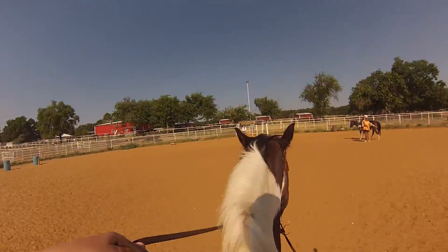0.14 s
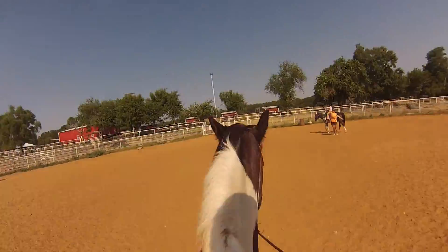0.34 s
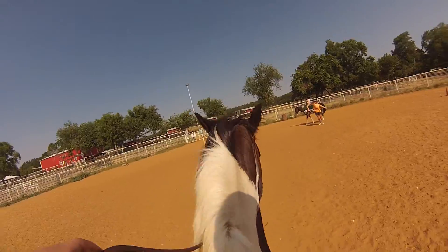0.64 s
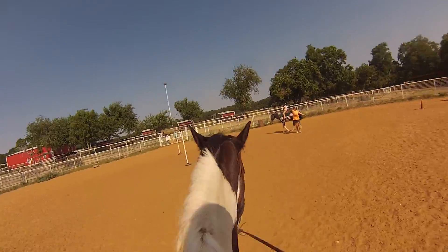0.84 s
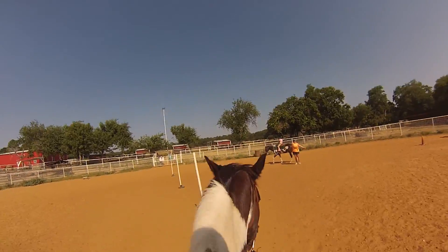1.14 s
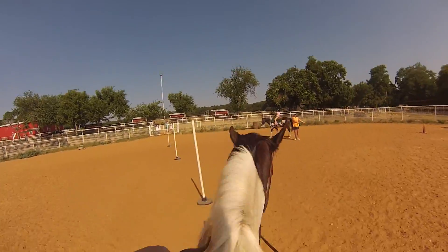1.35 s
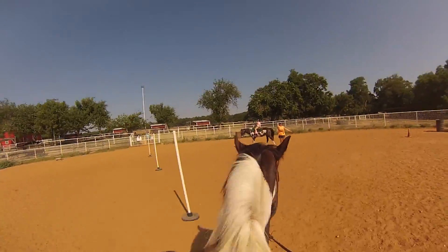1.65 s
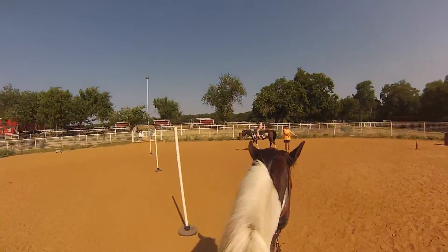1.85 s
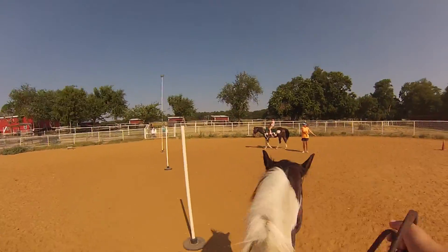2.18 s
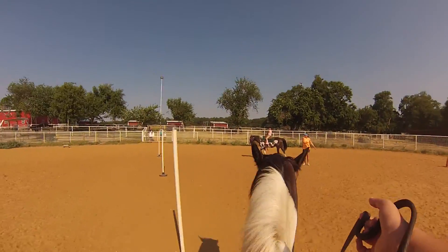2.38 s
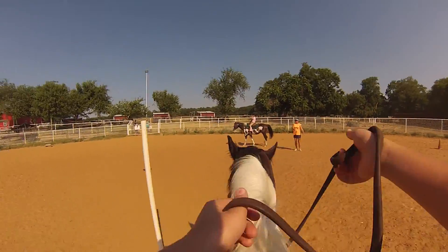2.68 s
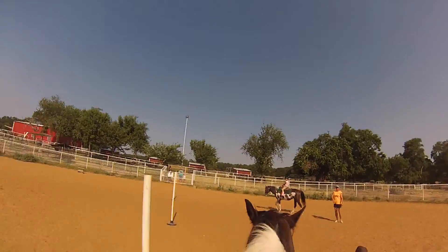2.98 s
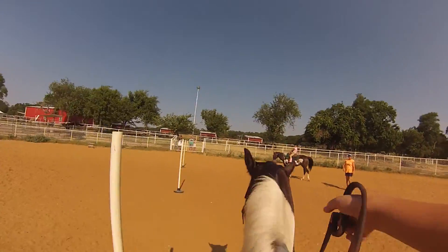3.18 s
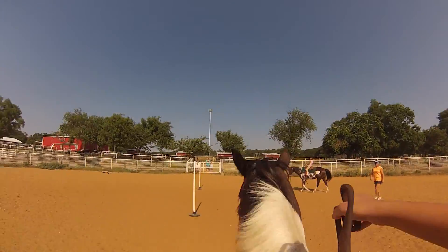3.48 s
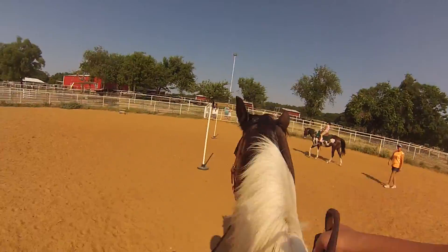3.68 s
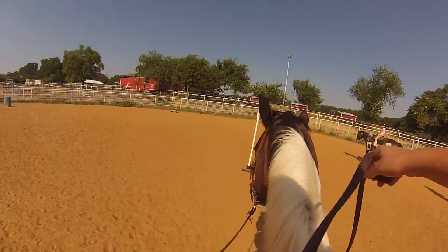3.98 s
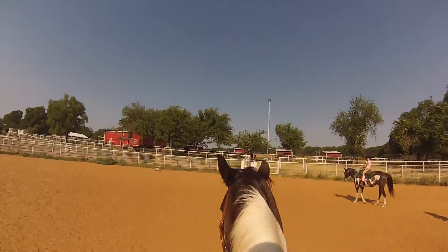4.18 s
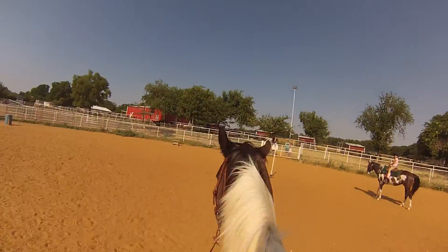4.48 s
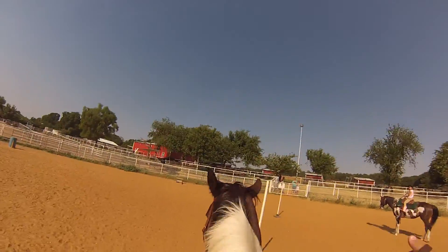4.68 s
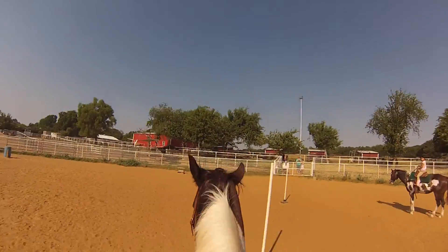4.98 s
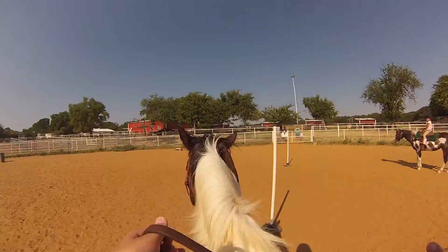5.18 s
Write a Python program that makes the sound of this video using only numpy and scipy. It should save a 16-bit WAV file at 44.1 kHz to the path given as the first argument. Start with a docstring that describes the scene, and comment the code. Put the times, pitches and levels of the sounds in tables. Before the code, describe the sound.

Close, dry, nearly mono handling sound. A loose clip ticks roughly every quarter second over low rumble and faint hiss. Buckles tap, plastic clacks with a short metallic ring, and harness bumps dully. The first half is lighter; the second brings bursts of rubbing and shaking, then heavy distorted thuds repeating until the end. The outdoor arena itself adds no audible echo.

```python
"""Camera housing on horseback

A camera in a plastic housing rides on a trotting, then cantering rider in a sandy arena.
Struck resonances make the ticking clip, the knocking housing and the tapping straps and harness.
Shaped noise makes body rumble, shaking, rubbing, hiss and a faint squeak; landings are pulses of
pressure that thump on the sealed-in microphone and crackle as the microphone capsule distorts."""
import sys
import numpy as np
from scipy import signal
from scipy.io import wavfile
from scipy.ndimage import uniform_filter1d

SR = 44100
rng = np.random.default_rng(int(sys.argv[2]) if len(sys.argv) > 2 else 0)


def boost(x):
    """Linear amplitude factor 10**(x/20) for a level x in decibels (scalar or array-like)."""
    u = np.asarray(x, float) / 20
    return 10 ** u


def master(y):
    """Save y as 16-bit WAV."""
    cut = np.clip(np.atleast_2d(y).T, -1, 1)
    pcm = np.round(cut * 32767)  # scale
    wavfile.write(sys.argv[1], SR, pcm.astype(np.int16))


N = 235208   # samples, 5.33 s


def rms_one(x):
    """Normalisation of signal power: scaled to unit rms."""
    return x / np.sqrt(np.mean(x ** 2) + 1e-20)


def low_pass(x, hz, order=2):
    """Butterworth low-pass filtering: the spectrum falls off above hz."""
    return signal.sosfilt(signal.butter(order, hz, fs=SR, output="sos"), x)


def drift(rate_hz):
    """Random modulation: low-passed noise of spread 1, computed at every 40th sample."""
    r = np.exp(-80 * np.pi * rate_hz / SR)
    white = rng.standard_normal(N // 40 + 2002)
    slow = signal.lfilter([1], [1, -2 * r, r * r], white)[2000:]   # settled part only
    return np.interp(np.arange(N) / 40, np.arange(len(slow)), rms_one(slow))


def coloured(spectrum, patchy_db):
    """Spectral shaping: noise in third-octave bands, each flickering on its own; unit rms."""
    hz, level_db = np.transpose(spectrum)
    white, out = rng.standard_normal((2, N)), np.zeros(N)
    octaves = np.log2(min(hz[-1], .45 * SR) / hz[0])
    edges = hz[0] * 2 ** np.arange(0, octaves, 1 / 3)
    for k, (low, high) in enumerate(zip(edges, edges[1:])):
        band_filter = signal.butter(2, [low, high], "band", fs=SR, output="sos")
        band = signal.sosfilt(band_filter, white[k % 2])   # neighbours take different noise
        band_db = np.interp(np.log(low * high) / 2, np.log(hz), level_db)
        out += band * boost(band_db + patchy_db * drift(17))
    return rms_one(out)


def evened(x, window_s):
    """Envelope levelling: chance swells taken out, so that the motion alone sets the level."""
    power = uniform_filter1d(x ** 2, int(window_s * SR))
    return rms_one(x / np.sqrt(power + .1 * np.mean(x ** 2)))


def swells(times, level_db, rise_s, fall_s):
    """Exponential envelopes, summed: each climbs 20 dB within the rise, sinks 20 dB within the fall."""
    out, t = np.zeros(N), np.arange(N) / SR
    for s, db, rise, fall in np.broadcast(times, level_db, rise_s, fall_s):
        distance = np.where(t < s, (s - t) / max(rise, .005), (t - s) / max(fall, .005))
        out += boost(db - 20 * distance)
    return out


def ring(clicks, hz, t60):
    """Damped oscillator: a unit click sets a decaying sine of height 1 ringing."""
    r, w = boost(-60 / (max(t60, .002) * SR)), 2 * np.pi * hz / SR
    return signal.lfilter([0, np.sin(w)], [1, -2 * r * np.cos(w), r * r], clicks + 1e-18)


def chatter(times, length_ms, count=5):
    """Repeated impact: a first contact and weaker rebounds, as sample positions and signed sizes."""
    draw = rng.random((len(times), 2, count))
    lag = draw[:, 0] * (np.arange(count) > 0)   # share of the chatter length; 0 is the first contact
    at = (times[:, None] + lag * length_ms / 1000) * SR
    sign = np.where(lag > 0, np.sign(draw[:, 1] - .5), 1)
    size = boost(-8 * lag - 5 * (lag > 0)) * sign
    return np.minimum(at.astype(int), N - 1), size


def first(blows):
    """Single impact: only the first contact of each blow."""
    return blows[0][:, :1], blows[1][:, :1]


def struck(modes, blows, level_db, soft=False):
    """Modal excitation: all modes feel the same contacts, each with strengths of its own."""
    out, (at, size) = np.zeros(N), blows
    for k, (hz, db, t60) in enumerate(modes):
        clicks = np.zeros(N)
        weaker_db = 4 * rng.random(size.shape)
        np.add.at(clicks, at, size * boost(db + level_db[:, None] - weaker_db))
        mode = ring(clicks, hz, t60)
        if soft:   # the resonance applied twice swells in; brought back to height 1
            mode = ring(mode, hz, t60) * 2 * np.e * np.log(1000) / (t60 * SR)
        out += mode * (-1) ** k
    return out


def crack(times, level_db, length_ms, spectrum):
    """Broadband contact noise: a burst that decays faster the shorter the chatter."""
    shape, t = np.zeros(N + SR), np.arange(SR // 20) / SR
    burst = np.exp(-1400 * t / length_ms) * (1 - np.exp(-t / 0.0001))
    for s, db in zip(times, level_db):
        shape[round(s * SR):][:len(t)] += boost(db) * burst
    return shape[:N] * coloured(spectrum, patchy_db=1.5)


def dull(events, rise_hz):
    """Single-mode impact: soft contacts with one pitch each, low-passed at rise_hz."""
    out = np.zeros(N)
    for s, db, hz, t60 in np.array(events)[:, :4]:
        contact = chatter(np.array([s]), 3.0, count=1)
        out += struck([(hz, db, t60)], contact, np.zeros(1))
    return low_pass(out, rise_hz)


# liveliness of the gait: time_s, level_db
GAIT = [(0.0, -46.5), (0.8, -45), (1.5, -48.5), (1.77, -46.5), (2.52, -42), (3.38, -41), (3.58, -40),
        (4.9, -41.5), (5.02, -45.5), (5.33, -46)]


def gait():
    """Common modulation: one level in dB over time, which the steady layers follow."""
    s, level_db = np.transpose(GAIT)
    return np.interp(np.arange(N) / SR, s, level_db)


# pass band of the body rumble: low_hz, high_hz
RUMBLE_BAND = (3.73, 25.5)
# the rider's weight coming down swells the rumble: peak_s, level_db
HEAVES = [(0.18, -25), (0.68, -36), (1.21, -28), (1.45, -24), (1.661, -28.5), (2.08, -27.5), (2.441, -30),
          (2.781, -33.5), (3.59, -9), (3.738, -22), (4.03, -14.5), (4.412, -11), (4.578, -24.5),
          (4.841, -15.5), (4.959, -25.5), (5.25, -12)]


def rumble(gait_db):
    """Low-frequency random vibration: band-passed noise under the gait and the falling weight."""
    band = signal.butter(1, RUMBLE_BAND, "band", fs=SR, output="sos")
    low = low_pass(signal.sosfilt(band, rng.standard_normal(N + SR)), 34)[SR:]
    level = boost(gait_db + 7) + swells(*np.transpose(HEAVES), rise_s=0.055, fall_s=0.055)
    return level * evened(low, window_s=0.93)


# the harness strains against the body: peak_s, rubbing_db, shaking_db, rise_s, fall_s
STRAINS = [(0.04, -86, -49.5, 0.019, 0.045), (0.389, -60, -60, 0.15, 0.011),
           (0.96, -47.5, -47.5, 0.084, 0.056), (1.2, -59, -46, 0.11, 0.067), (1.44, -57, -47, 0.18, 0.22),
           (1.65, -57, -39.5, .03, 0.05), (2.11, -55.5, -49.5, 0.065, 0.35),
           (2.449, -52.5, -52.5, 0.12, 0.17), (2.701, -61, -36, 0.033, 0.083),
           (3.011, -36.5, -31, 0.029, 0.13), (3.37, -46, -48, .12, 0.14), (3.569, -36, -25.5, 0.029, 0.02),
           (3.8, -43, -32.5, 0.11, 0.083), (3.989, -42.5, -29.5, 0.044, 0.076),
           (4.22, -56.5, -47, 0.034, 0.083), (4.389, -43.5, -24.5, 0.033, 0.041),
           (4.601, -52, -52, 0.1, 0.2), (4.81, -43.5, -29, .04, 0.071), (5.031, -56.5, -47, 0.064, 0.22),
           (5.23, -45, -25.5, 0.047, 0.032)]


def strains():
    """Load-driven excitation: the envelopes of rubbing and of shaking under each strain."""
    s, rub_db, shake_db, rise, fall = np.transpose(STRAINS)
    return swells(s, rub_db, rise, fall), swells(s, shake_db, rise, fall)


# spectrum of the shaken housing: frequency_hz, density_db (per Hz)
SHAKE = [(50, -14), (80, 8), (130, 3), (200, 0), (300, -26.5), (500, -9)]


def shaking(gait_db, strain):
    """Forced random vibration: flickering low noise of the housing follows gait and strain."""
    noise = evened(coloured(SHAKE, patchy_db=2.5), window_s=0.012)
    return boost(2.0 * drift(16)) * noise * (boost(gait_db - 9) + strain)


# spectrum of cloth and leather friction: frequency_hz, density_db (per Hz)
RUB = [(150, -31), (260, -3), (484, -2), (873, -7), (1360, -4), (1740, -29.5), (1980, -13), (2370, -6),
       (2930, -9.5), (3940, -20), (4410, -13), (7210, -30.5), (13000, -25.5)]
# resonances of the housing under rubbing: frequency_hz, width_hz, level_db
RUB_RINGS = [(1100, 200, -8), (2480, 250, -4), (3950, 200, -12), (4800, 200, -19), (6000, 300, -20),
             (10600, 500, -27)]


def rubbing(gait_db, strain):
    """Stick-slip friction: a hiss with tiny slips in it, carried through the housing's resonances."""
    slips_per_s, slip_spread_db, slip_decay_s = 700, 3.5, 0.00084
    sizes = boost(slip_spread_db * np.minimum(rng.exponential(1, N), 4))
    slips = (rng.random(N) < slips_per_s / SR) * sizes
    slipping = rms_one(signal.lfilter([1], [1, -np.exp(-1 / (slip_decay_s * SR))], slips))
    friction = coloured(RUB, patchy_db=1.0) * (1 + boost(-6) * slipping)
    rings = sum(boost(db) * rms_one(ring(friction, hz, 2.0 / width)) for hz, width, db in RUB_RINGS)
    rub = rms_one(rms_one(friction) + rings) * boost(3 * drift(40))
    steady_db = -72 + 0.95 * (gait_db - gait_db.mean())
    return rub * (boost(steady_db) + strain)


# spectrum of the self-noise: frequency_hz, density_db (per Hz)
SELF_NOISE = [(150, -18.5), (260, -0.5), (1620, -13), (2440, -9.5), (2950, -17), (3960, -17), (12400, -27),
              (14900, -26.5), (16000, -53)]


def self_noise():
    """Stationary background noise: a steady coloured hiss."""
    return boost(-61) * coloured(SELF_NOISE, patchy_db=1.46)


# straps and buckles tapping: start_s, level_db, pitch_hz, t60_s, edge_db (relative to level)
TAPS = [(0.048, -31, 1094, 0.062, -1.5), (0.834, -39, 1075, 0.061, -3), (1.224, -52.5, 500, .01, 10),
        (1.24, -32.5, 1070, 0.061, 1), (1.415, -27, 530, 0.03, -6), (1.635, -33, 780, 0.028, -9),
        (1.722, -44, 447, 0.017, 3), (3.362, -34, 423, 0.022, 0), (3.544, -32.5, 405, 0.026, -27),
        (3.649, -36, 505, 0.021, -8), (3.753, -29, 1096, 0.064, -13), (3.946, -36, 474, 0.031, -3.5),
        (3.973, -46, 473, 0.02, 11.5), (4.153, -34.5, 463, 0.013, -29), (4.244, -56, 504, .01, 14),
        (4.261, -51, 500, 0.0092, 15), (4.275, -61, 500, .01, 10), (4.333, -60, 500, .01, 12),
        (4.359, -40.5, 472, 0.091, 4), (4.397, -50, 500, .01, 17), (4.44, -55, 497, 0.011, 20),
        (4.457, -36, 1700, 0.03, 5), (4.894, -30.5, 857, 0.029, -4.5), (5.033, -25, 473, 0.0068, -27),
        (5.198, -37.5, 411, 0.085, 6), (5.244, -38.5, 420, 0.011, 18.5), (5.321, -30, 850, 0.021, -3)]
# short resonances of the housing's body, lid and upper range: frequency_hz, level_db, t60_s
BODY = [(497.6, 3.7, 0.019), (778, 3.8, 0.021), (1137, 4.2, 0.014), (1295, 5, 0.018), (1745, 7.9, 0.0086)]
BODY_LID = [(1966, -2, 0.018), (2207, 1.5, 0.013), (2429, -4.5, 0.011), (2720, -0.5, 0.0026)]
BODY_HIGH = [(3910, -5, 0.009), (3380, -7, 0.0067), (4694, -22.5, 0.033), (6470, -21, 0.013),
             (10730, -8, 0.0033)]


def taps():
    """Impact on a coupled body: each tap has its own pitch and an edge from the whole housing."""
    s, db, _, _, edge_db = np.transpose(TAPS)
    edge = struck(BODY + BODY_LID + BODY_HIGH, chatter(s, 6.0), db + edge_db - 11)
    return dull(TAPS, rise_hz=2500) + edge


# loose clip ticking on the housing: start_s, level_db, upper_db, low_db (rings, relative to level)
TICKS = [(0.06, -29, 4, -11.5), (0.2444, -26.5, 2, -19.5), (0.4957, -31.5, 10.5, -17.5),
         (0.7254, -32, 5.5, -19.5), (1.0858, -24, 1, -21), (1.3475, -30, 2, -14.5), (1.5874, -22.5, 1, -22),
         (1.8279, -25, -2.5, -18), (2.098, -35, 6.5, -19), (2.3039, -23.5, 0, -22),
         (2.5263, -23.5, -4, -12), (2.7423, -25, -0.5, -10.5), (2.961, -29.5, 5.5, -17.5),
         (3.1797, -25.5, 0.5, -20), (3.422, -19, 1.5, -20), (3.6738, -37, -4, -21),
         (3.8815, -19.5, -6.5, -22), (4.0704, -27.5, 1, -21), (4.3026, -22.5, 2.5, -17),
         (4.5287, -27.5, 1.5, -6.5), (4.777, -24, 1, -23.5), (4.9881, -31.5, 6.5, -11.5),
         (5.2066, -27, -0.5, -8.5)]
CLIP = [(5084, 1.5, 0.011), (5466, 9, 0.0052), (3360, -13.5, 0.0085), (4046, -10.5, 0.0065),
        (6270, -25.5, 0.0055), (9920, -19.5, 0.0084)]
CLIP_UPPER = [(7170, 3.4, 0.0048), (7535, 3.6, 0.01), (7792, 6.5, 0.0057)]
CLIP_HIGH = [(12170, 11.5, 0.0029), (13000, -3.5, 0.007), (13360, -7, 0.0081), (10550, -0.5, 0.0017)]
CLIP_LOW = [(2190, -1, 0.012), (2330, -3, 0.012), (2584, -9, 0.008), (1300, -12, 0.012)]
SNAP = [(900, -2.5), (2300, 2.5), (3200, -21), (6000, 8), (8200, -2.5), (9000, -20), (12500, -6),
        (16000, -30)]
# long-ringing metal of the mount: frequency_hz, knock_db, tick_db, t60_s
METAL = [(2030, -7, -19, .12), (2255, -16, -30, .13), (3700, -43, -50, .12), (4877, -44, -27, .14),
         (5295, -40, -13, .088), (5448, -56, -25, .22), (5715, -62, -35, .15), (6550, -38, -27, .09),
         (6760, -62, -33, .15), (7461, -58, -34, .16)]


def ticks():
    """Light impact with rebounds: bright, thin contacts; the duller ones wake the metal most."""
    chatter_ms = 3.65
    s, db, upper_db, low_db = np.transpose(TICKS)
    high_db = -26.5 + 1.2 * upper_db   # the highest ring follows the upper one
    blows = chatter(s, chatter_ms, count=7)
    out = struck(CLIP, blows, db - 12.5, soft=True)
    out += struck(CLIP_UPPER, blows, db + upper_db - 13.5, soft=True)
    out += struck(CLIP_HIGH, blows, db + high_db, soft=True)
    out += struck(CLIP_LOW, blows, db + low_db + 5.5, soft=True)
    out += crack(s, db - 10.5, chatter_ms, SNAP)
    metal = [(hz, tick_db, t60) for hz, _, tick_db, t60 in METAL]
    uneven_db = 3 * rng.standard_normal(len(s))
    return out + struck(metal, first(blows), db - 9.5 - .3 * upper_db + uneven_db)


# housing knocking in its mount: start_s, level_db, treble_db, bass_db, lid_db (relative to level)
KNOCKS = [(0.108, -15.5, -6, -10, -4.5), (1.128, -24.5, -32, -8, -14), (1.5865, -4.5, -15.5, -10, -6.5),
          (2.0866, -10.5, -7, -12.5, -8.5), (2.305, -28.5, -12, -0.5, -9), (2.466, -46.5, 12, -17, 2.5),
          (2.7236, -6, -27, -10.5, -8.5), (2.9908, -18, -10, -18, -6), (3.007, -4, -15.5, -10.5, -7.5),
          (3.441, -23, -38, -14, -10.5), (3.799, -10, -6, -8.5, -4), (4.6353, -11.5, -3.5, -17.5, -2.5),
          (5.052, -27.5, -12, -2, -7)]
# low resonances of the housing: frequency_hz, level_db, t60_s
BODY_LOW = [(165, 5, 0.039), (112, -19, 0.058)]
# spectrum of the housing's contact: frequency_hz, density_db (per Hz)
CLACK = [(330, -5), (500, 7), (1000, -17.5), (2500, 1.5), (3000, -5), (5000, -29.5), (8000, -35.5),
         (9000, -45.5), (15000, -32)]


def knocks():
    """Heavy impact: blows crack and set the modes of the plastic body and the metal ringing."""
    chatter_ms = 4.5
    s, db, high_db, low_db, lid_db = np.transpose(KNOCKS)
    blows = chatter(s, chatter_ms)
    out = struck(BODY, blows, db - 7.0)
    out += struck(BODY_LID, blows, db + lid_db + 0.5, soft=True)   # the lid takes up the blow later
    out += struck(BODY_HIGH, blows, db + high_db + 9)
    out += struck(BODY_LOW, first(blows), db + low_db + 2)
    out += crack(s, db - 5, chatter_ms, CLACK)
    metal = [(hz, knock_db, t60) for hz, knock_db, _, t60 in METAL]
    glancing_db = .6 * np.maximum(high_db, -17)   # glancing, bright blows wake the metal less
    out += struck(metal, first(blows), db + lid_db - 8 - glancing_db)
    return low_pass(out, 9000)


# dull bumps of the harness: start_s, level_db, pitch_hz, t60_s
BUMPS = [(0.239, -29.5, 130, 0.023), (0.421, -26.5, 161, 0.027), (0.902, -26, 194, 0.048),
         (1.413, -24, 178, 0.071), (1.721, -27.5, 140, 0.036), (2.207, -21, 160, 0.046),
         (2.738, -9, 186, 0.014), (3.361, -33, 140, 0.04), (3.557, -12.5, 156.5, 0.12),
         (3.999, -41, 165, 0.12), (4.144, -32.5, 194, 0.045), (4.385, -17.5, 120, 0.14),
         (4.648, -9.5, 164.5, 0.065), (4.775, -17, 151, 0.0066), (5.031, -27, 132, 0.096)]


def bumps():
    """Soft impact: a compliant contact excites one low mode and little treble."""
    return dull(BUMPS, rise_hz=500)


# landings shoving the microphone: peak_s, level_db, width_ms, direction (+1 or -1)
JOLTS = [(1.212, -19, 23, 1), (3.566, -3.5, 9.3, 1), (3.574, 1, 2.32, -1), (4.008, -9.5, 2.75, -1),
         (4.033, -17, 13, 1), (4.363, -12.5, 3.1, 1), (4.39, 2.5, 2.28, 1), (4.414, -8.5, 3.9, -1),
         (4.818, -4, 5.8, 1), (4.827, -9, 1.46, -1), (5.221, 3, 8.4, -1), (5.224, 5.5, 1.96, 1),
         (5.237, 1, 2.64, -1), (5.245, -4.5, 2.36, -1)]
# spectrum of the capsule's crackle: frequency_hz, density_db (per Hz)
CRACKLE = [(500, 2.5), (2000, -11.5), (6000, -11.5), (12000, -22.5), (16000, -26)]


def jolts():
    """Pressure leakage: shoved air leaks and swings back; the overdriven capsule crackles at its height."""
    swing_hz, swing_q = 20.5, 1.67
    push, out, t = np.zeros(N), np.zeros(N), np.arange(N) / SR
    crackle = coloured(CRACKLE, patchy_db=4.0) * boost(4.0 * drift(150))
    for s, db, ms, direction in JOLTS:
        push += boost(db) * np.sign(direction) / np.cosh(1500 * (t - s).clip(-.2, .2) / ms)
        crackle_db = db - 20.5 - 6.5 * ms   # wide, slow shoves crackle less
        out += boost(crackle_db) * crackle * np.exp(-.5 * ((t - s) / 0.0026) ** 2)
    w = 2 * np.pi * swing_hz
    leak = signal.bilinear([1, 0, 0], [1, w / swing_q, w * w], SR)   # resonant high-pass
    return out + signal.lfilter(*leak, push)


# a strap squeaks faintly, one event: peak_s, level_db, pitch_hz, rise_s, fall_s
SQUEAK = (5.19, -56, 1900, .06, .02)


def squeak():
    """Resonant filtering: noise through one narrow resonance."""
    s, db, hz, rise, fall = SQUEAK
    return swells([s], db, rise, fall) * rms_one(ring(rng.standard_normal(N), hz, .08))


def scene():
    """Superposition: all sounds add at one microphone, the same in both channels."""
    gait_db = gait()
    rub_strain, shake_strain = strains()
    steady = rumble(gait_db) + shaking(gait_db, shake_strain)
    steady += rubbing(gait_db, rub_strain) + self_noise()
    contacts = taps() + ticks() + knocks() + bumps()
    return np.tile(steady + contacts + jolts() + squeak(), (2, 1))


def gain_control(x):
    """Dynamic range compression: the 20 ms mean, not single clicks, lowers the gain."""
    limit_db, share, recover_db_per_s, smoothing_s = -16.5, 0.6, 41.4, 0.0069
    mean_db = 20 * np.log10(uniform_filter1d(np.abs(x), SR // 50) + 1e-9)
    cut_db = share * np.maximum(mean_db - limit_db, 0)
    ramp = recover_db_per_s * np.arange(N) / SR
    held = np.maximum.accumulate(cut_db + ramp) - ramp   # recovers at a steady rate
    r = np.exp(-1 / (smoothing_s * SR))
    return boost(-signal.lfilter([1 - r], [1, -r], held))


def weak_side(x):
    """Near-mono sound: a very weak, randomly fluctuating side signal, strongest in the treble."""
    steady = boost(-77) * rng.standard_normal(N)
    fluctuation = boost(-24.98) * np.clip(drift(60), -2, 2)
    return steady + fluctuation * signal.lfilter([1, -.78], [1], x)


def band_limit(x):
    """A steep low-pass at the top of the band."""
    return signal.sosfilt(signal.butter(12, 16510, fs=SR, output="sos"), x)


def record(dry):
    """Nonlinear limiting: gain ducks under loud stretches, peaks are rounded and clipped, the top is cut."""
    ducked = dry * gain_control(dry[0])
    rounded = np.clip(1.4 * np.tanh(ducked / 1.4), -.9, .9)
    sound = low_pass(rounded, 15600, order=6)
    mix = sound + weak_side(sound[0]) * [[1], [-1]]
    return band_limit(mix)


dry = scene()
out = record(dry)
master(out)
```